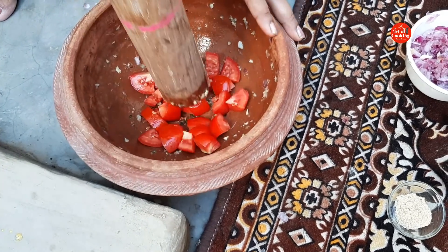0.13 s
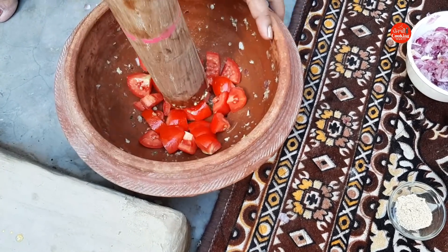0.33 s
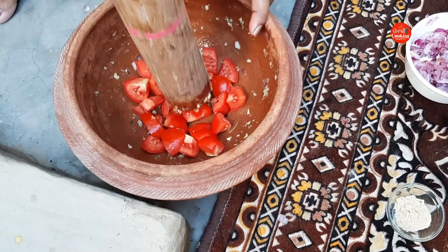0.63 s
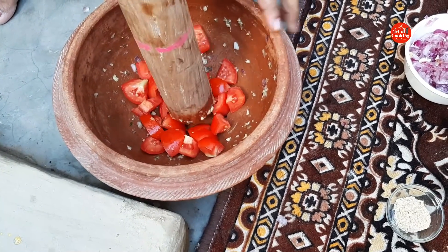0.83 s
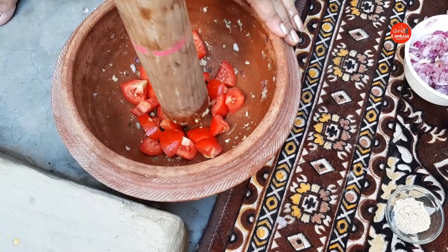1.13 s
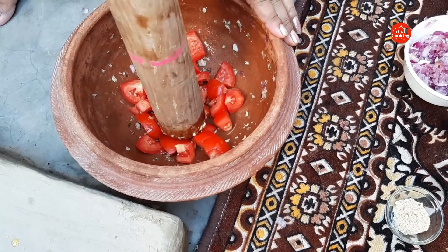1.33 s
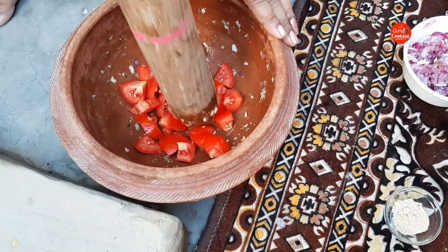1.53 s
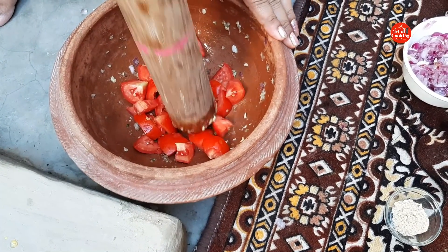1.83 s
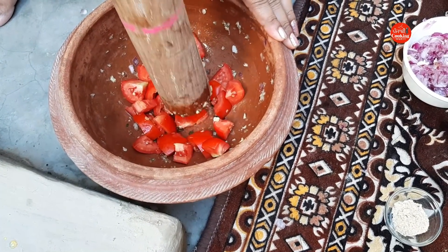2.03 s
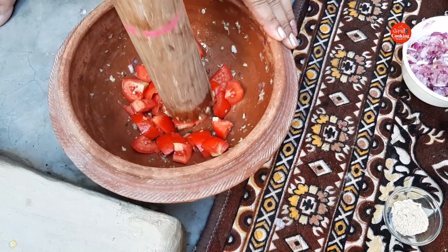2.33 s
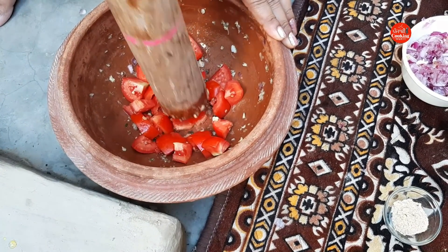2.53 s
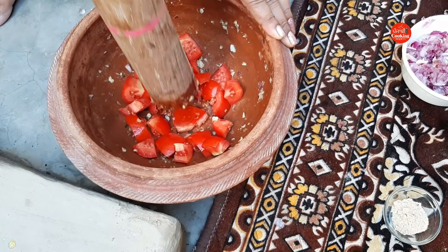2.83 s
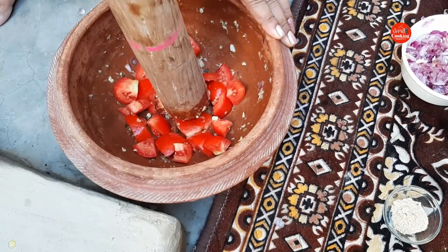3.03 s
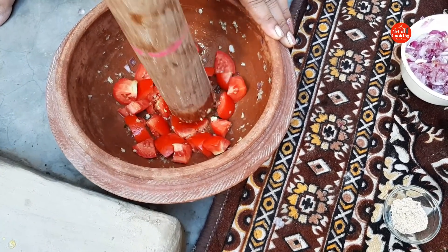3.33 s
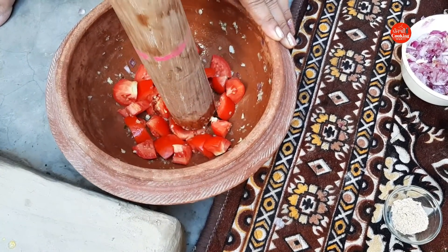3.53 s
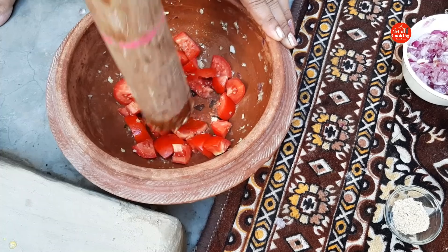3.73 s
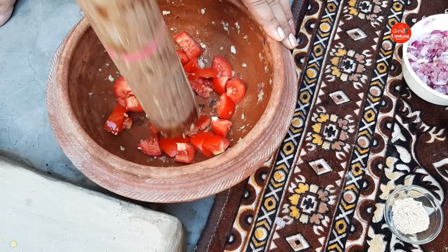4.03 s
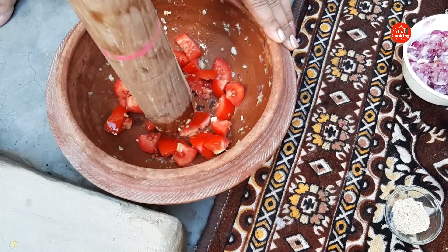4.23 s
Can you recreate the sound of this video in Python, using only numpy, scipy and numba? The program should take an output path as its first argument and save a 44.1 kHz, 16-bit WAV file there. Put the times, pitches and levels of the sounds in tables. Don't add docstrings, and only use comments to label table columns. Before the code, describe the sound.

Close up, a heavy wooden pestle thuds into cut tomatoes in a clay bowl. Light taps come first, then firmer blows about every quarter second, each with a wet squirt and a short hollow knock. After a brief gap come harder, bouncing hits. Water trickles steadily to the left above a low hum; the hard-floored room adds a little echo, and the phone gradually lowers the background.

```python
import sys
import numpy as np
from scipy import signal
from scipy.fft import rfft, irfft
from scipy.io import wavfile
from scipy.ndimage import uniform_filter1d
from numba import njit

SR = 44100
rng = np.random.default_rng(int(sys.argv[2]) if len(sys.argv) > 2 else 0)


def unload_wav(signal):
    wavfile.write(
        sys.argv[1],
        SR,
        np.round(np.clip(np.atleast_2d(signal).T, -1, 1) * 32767).astype(np.int16),
    )


def convert_level_to_amplitude(level_db):
    exponent = np.asarray(level_db, float) / 20
    return 10 ** exponent


N = 192978
TIME = np.arange(N) / SR

# t/s, force level/dB, weight passed to the floor/dB, hardness of contact/dB,
# wall pitch favoured by the spot hit f/Hz
PESTLE_BLOWS = [(0.107, -25, -9, -4, 505), (0.275, -23, -8.5, -8, 510), (0.91, -26, -4, 1.5, 500),
                (1.016, -30.5, -3.5, -3.5, 619), (1.078, -20.5, -9.5, -10, 500),
                (1.356, -27.5, 3.5, 3, 570), (1.626, -14, -13.5, -17.5, 477), (1.902, -10, -13.5, -6, 728),
                (2.175, -13, -10, -1, 513), (2.436, -6, -11.5, -4, 566), (2.725, -22, -4, -3.5, 525),
                (3.276, -11, -11.5, 14, 707), (3.558, -11.5, -10.5, 10.5, 667), (3.834, -39.5, -4, 2, 482),
                (3.873, -20.5, -17.5, -3.5, 585), (4.121, -17, -15.5, -2, 633),
                (4.16, -17.5, -14.5, -5, 500)]
# t/s, force level/dB
PESTLE_REBOUNDS = [
    (1.384, -17.5),
    (2.203, -15),
    (2.748, -22),
    (3.285, -7.5),
    (3.567, -12),
]
# t/s, force level/dB, weight passed to the floor/dB
PESTLE_NUDGES = [
    (0.023, -34.5, 1.5),
    (0.201, -33.5, -4.5),
    (0.387, -48.5, 10),
    (0.939, -26.5, -14),
    (1.126, -33.5, -9),
    (1.467, -40, 4.5),
    (4.295, -36.5, -2),
    (4.31, -32.5, -8),
]
# t/s, pulp level/dB, length/s, fineness of the jet/dB
JUICE_SQUIRTS = [(0.807, -29.5, 0.005, 11.5), (0.825, -36.5, 0.013, 8), (1.0753, -20, 0.012, 1.5),
                 (1.344, -26, 0.0068, 3), (1.61, -49, 0.0014, 11), (1.625, -11.5, .006, 6.5),
                 (1.9, -16.5, 0.0062, 1.3), (2.173, -7.5, .0065, -4), (2.187, -28, 0.013, -14),
                 (2.434, -12, 0.0043, 0.5), (2.709, -22, 0.0077, -4), (2.719, -10.5, 0.0094, -6.5),
                 (2.738, -46, 0.016, -18), (2.883, -31, 0.0059, -10), (2.99, -37, 0.01, 8),
                 (3.009, -32, 0.0095, -4.5), (3.27, -17.5, 0.0097, 0), (3.285, -9, .008, -26.5),
                 (3.293, -23.5, 0.05, -23.5), (3.5562, -21.5, 0.0041, 6), (3.566, -13.5, .009, -22),
                 (3.583, -36, .045, -17), (3.828, -42, 0.011, 4), (4.111, -26.5, 0.014, 3.5),
                 (4.1595, -32.5, 0.01, -35), (4.366, -40.5, 0.0081, 6.5)]
# f/Hz, level/dB, time to fall 60 dB t60/s
FLOOR_MODES = [(150.3, -16.5, 0.27), (170.4, 2, 0.19), (188.7, 9.5, 0.13), (202, -3.5, 0.19),
               (240.7, -12, 0.4)]
BELLY_MODES = [(329.7, -5, 0.058), (423.7, -3.5, 0.04), (452, 4.5, 0.028)]
WALL_MODES = [(499, 2.5, 0.053), (590, 4.5, 0.012), (652.7, 17, 0.016), (729.5, 10.5, 0.022),
              (822, -5.5, 0.081)]
WOOD_MODES = [(986, 3.5, 0.015), (1140, 4, 0.023), (1480, -3, 0.032), (1698, 4.5, 0.0062),
              (1960, 9, 0.0033)]
# f/Hz, level/dB, t60/s
ROOM_BANDS = [(127, -23.5, 0.85), (277.6, -17.5, 0.41), (525, -27.5, 0.26), (710, -28, 0.41),
              (1170, -24, 0.32), (2470, -19.5, 0.33), (4500, -16, 0.16), (9450, -20, .2)]
# t/s, level/dB
PHONE_GAIN = [(0, -1), (.8, -1.75), (1.6, -2), (2.5, -5), (3.2, -4.5), (3.4, -8.5), (3.52, -12),
              (3.64, -10), (3.69, -16), (3.9, -18.5), (4.38, -19)]
# t/s, level/dB, f/Hz
WATER_DROPS = [(0.4115, -30, 3950), (0.5475, -31.5, 4470), (0.7088, -29, 4500), (0.943, -34, 4500),
               (1.1443, -32, 3870), (1.517, -37.5, 4230), (1.545, -31, 4700), (2.1054, -29.5, 4400),
               (2.5064, -30, 3870), (2.5452, -31.5, 4100), (2.654, -34, 4350), (2.9064, -44, 3850),
               (2.968, -32, 4570), (3.1358, -32.5, 3800), (3.429, -34.5, 3960), (3.509, -37, 4430),
               (3.765, -55, 4220), (4.217, -41.5, 4080), (4.3, -38.5, 3850)]
# f/Hz, level/dB per Hz
HISS_COLOUR = [(710, -8.5), (1200, -11), (1760, -12), (2250, -6), (2550, -12.5), (3770, 2.5), (4420, 2),
               (5370, -0.5), (7870, 0), (10000, -12), (13000, -11), (22000, -120)]
# f/Hz, level/dB per Hz
HOUSE_COLOUR = [(41, -5.5), (70, -14.5), (103, -3.5), (172, 0.5), (380, -9), (441, -8.5), (755, -14),
                (1260, -21.5), (2190, -39), (2500, -71), (3250, -58), (5500, -120)]
# t/s, width/s, murmur level/dB, drone level/dB
HOUSE_SWELLS = [
    (0, .3, 8.5, 5),
    (.6, 0.52, -4.5, -5.5),
    (2.0, 0.27, -0.5, 7.5),
    (3.75, 0.29, -5, 4),
]
# f/Hz, level/dB
MAINS_TONES = [(100, -103), (170, -60)]
# t/s, length/s, start f/Hz, end f/Hz, level/dB
FAR_WHISTLES = [
    (2.531, 0.2, 1280, 1490, -61),
    (3.834, 0.051, 5000, 5200, -53),
    (4.304, 0.0509, 4860, 5050, -56),
]

BOWL_LAG, WATER_LAG = 4, 20
LEFT_RIGHT = np.array([[1], [-1]])


def level(x, db):
    return x * convert_level_to_amplitude(db) / np.sqrt(np.mean(x ** 2))


def band(x, lo_hz, hi_hz):
    sos = signal.butter(2, [lo_hz, min(hi_hz, .45 * SR)], "bandpass", fs=SR, output="sos")
    return signal.sosfilt(sos, x)


def low_pass(x, hz):
    return signal.sosfilt(signal.ellip(10, .2, 85, hz, fs=SR, output="sos"), x)


def colour(x, table):
    hz, db = np.transpose(table)
    f = np.maximum(np.arange(N // 2 + 1) * SR / N, 1)
    return irfft(rfft(x) * convert_level_to_amplitude(np.interp(np.log(f), np.log(hz), db)), N)


def walk(rate):
    hold = int(SR / rate)
    steps = np.repeat(rng.standard_normal(N // hold + 1), hold)
    return uniform_filter1d(steps, hold)[:N]


def die_away(t, t60):
    return np.exp(-np.log(1000) * t / t60)


def add(out, s, x, pan_db=0., lag=0):
    for ch, sign in enumerate((1, -1)):
        i = int(s * SR) + ch * lag
        n = max(min(len(x), N - i), 0)
        out[ch, i:i + n] += x[:n] * convert_level_to_amplitude(sign * pan_db / 2)


def blows():
    hits = strikes()
    out = np.zeros((2, N))
    chance = rng.standard_normal((len(hits), 4, 10))
    sway = walk(45)
    sway_starts = rng.integers(0, N - SR // 2, (len(hits), 5))
    for (s, belly_db, floor_db, wall_db, wood_db, spot_hz), c, starts in zip(hits, chance, sway_starts):
        rocking = np.array([sway[i:i + SR // 2] for i in starts])
        wall_modes = [(hz, db - 40 * np.log2(hz / spot_hz) ** 2, t60) for hz, db, t60 in WALL_MODES]
        floor = ring(FLOOR_MODES, floor_db, 0.016, c[0], rocking)
        belly = ring(BELLY_MODES, belly_db - 6, 0.0028, c[1], rocking[::-1])
        wall = ring(wall_modes, wall_db, 0.0024, c[2], rocking)
        wood = ring(WOOD_MODES, wood_db, 0.00041, c[3], rocking)
        add(out, s + .001, floor + belly, .5, BOWL_LAG)
        add(out, s + 0.0009, wall + wood, 3.0, BOWL_LAG)
        i = int(s * SR)
        wet = slosh(wall_db, rng.standard_normal((3, SR // 8)))
        out[:, i:i + SR // 8] += wet[:, :N - i]
    return out


def strikes():
    bottom_hz = 515
    rows = []
    for s, db, floor, hard, hz in PESTLE_BLOWS:
        wood_db = min(db + hard - 6, -20)
        rows.append((s, db, db + floor, db + hard, wood_db, hz))
    for s, db in PESTLE_REBOUNDS:
        rows.append((s, db, db - 10, db - 11.5, db - 5, bottom_hz))
    for s, db, floor in PESTLE_NUDGES:
        rows.append((s, db, db + floor, db - 6.5, db - 11, bottom_hz))
    return rows


def ring(modes, db, rise_s, chance, rocking):
    t = TIME[:SR // 2]
    hz, mode_db, t60 = np.transpose(modes)[:, :, None]
    k = len(modes)
    shifted_hz = hz * (1 + 0.022 * chance[:k, None])
    tones = np.sin(2 * np.pi * shifted_hz * t) * die_away(t, t60)
    waver_db = 3.5 * (rocking[:k] - rocking[:k, :1])
    balance_db = mode_db + 3.0 * chance[5:5 + k, None] + waver_db
    x = (convert_level_to_amplitude(balance_db) * tones).sum(axis=0) * (1 - np.exp(-t / rise_s))
    return convert_level_to_amplitude(db) * x / np.abs(x).max()


def slosh(wall_db, noise):
    t = TIME[:noise.shape[1]]
    rattle = band(noise[0] + 1.24 * noise[1:], 487, 906)
    x = rattle * die_away(t, 0.15) * (1 - np.exp(-t / 0.0037))
    return convert_level_to_amplitude(1.28 * wall_db - 8) * x / np.abs(x).max()


def squirts(count=70):
    size = SR // 10
    out = np.zeros((2, N + SR))
    chance = rng.random((len(JUICE_SQUIRTS), 2, 6, count))
    noise = rng.standard_normal((len(JUICE_SQUIRTS), 3, size))
    t = TIME[:size]
    for (s, pulp_db, length, fine_db), c, hiss in zip(JUICE_SQUIRTS, chance, noise):
        length = np.clip(length, .002, .05)
        pulp_hz = 3442 - 118 * s
        fizz_db, spray_db = pulp_db + fine_db, pulp_db - 8 + 0.52 * fine_db
        rise = np.minimum(t / (0.073 * length), 1)
        shape = rise * np.cos(np.pi / 2 * np.minimum(t / length, 1)) ** 1.2
        pulp = convert_level_to_amplitude(pulp_db) * pockets(c[0], pulp_hz, 0.6, length, size, 0.56)
        fizz = convert_level_to_amplitude(fizz_db) * pockets(c[1], 6300, .9, length, size, 0.3)
        spray = convert_level_to_amplitude(spray_db) * shape * band(0.12 * hiss[0] + hiss[1:], 5300, 21000)
        skin = convert_level_to_amplitude(pulp_db - 8) * shape * band(band(hiss[0], 1880, 5700), 1300, 7400)
        i = int(s * SR)
        out[:, i:i + size] += (pulp + fizz + spray + skin) * convert_level_to_amplitude(.8 * LEFT_RIGHT)
    return out[:, :N]


def pockets(c, hz, octaves, length, size, peak):
    pitch = np.clip(hz * 2 ** (octaves * (0.39 * (c[0] - .5) + c[1] - .5)), 500, 16000)
    start = (c[0] * length * SR).astype(np.int64)
    late = BOWL_LAG + (14 * (c[5] - .3) * pitch / 8000).astype(np.int64)
    squeeze = 0.48 + np.exp(-((c[0] - peak) / 0.49) ** 2)
    gain = np.sign(c[3] - .5) * convert_level_to_amplitude(-3.5 * np.log(c[4] + .01)) * squeeze
    cycles = 2.5 + 4 * c[2]
    ports = [bubbles(size, np.maximum(start + k * late, 0), pitch, cycles, gain, 0.091) for k in range(2)]
    x = np.array(ports)
    return x / np.abs(x).max()


@njit
def bubbles(size, start, hz, cycles, gain, glide):
    out = np.zeros(size)
    for k in range(len(start)):
        w = 2 * np.pi * hz[k] / SR
        n = int(cycles[k] * SR / hz[k]) + 2
        phase = 0.
        for i in range(min(3 * n, size - start[k])):
            phase += w * (1 + glide * i / n)
            out[start[k] + i] += gain[k] * np.exp(-2. * i / n) * np.sin(phase)
    return out


def room(x):
    t = TIME[:SR // 2]
    tail = 0
    for hz, db, t60 in ROOM_BANDS:
        mid, side = band(rng.standard_normal((2, len(t))), hz / np.sqrt(2), hz * np.sqrt(2))
        pair = mid + np.clip(hz / 450, 0, 1) * side * LEFT_RIGHT
        fade = die_away(t, t60) * np.clip((t - .004) / 0.00097, 0, 1)
        tail = tail + convert_level_to_amplitude(db - 17.5) * pair * fade
    return signal.fftconvolve(x[:1], tail, axes=1)[:, :N]


def background():
    noise = rng.standard_normal((8, N))
    hiss_db = -50 + gain_db(0.97) + 1.5 * walk(10)
    hiss = level(colour(noise[:3], HISS_COLOUR), 0) * convert_level_to_amplitude(hiss_db)
    flutter = band(hiss[0], 4800, 8500) * (convert_level_to_amplitude(1.6 * walk(5.94)) - 1)
    water = trickle(-49 + gain_db(0.58)) + hiss[0] + flutter
    ports = np.array([convert_level_to_amplitude(6.0) * water, convert_level_to_amplitude(-3.5) * np.roll(water, WATER_LAG)]) + 2.33 * hiss[1:]
    house_db = -52 + swell_db(axis=2) + gain_db(0.33) + 0.6 * walk(6.44)
    house = level(colour(noise[4:6], HOUSE_COLOUR), 0) * convert_level_to_amplitude(house_db)
    murmur = house[0] + 0.13 * house[1] * LEFT_RIGHT
    air_db = -49.5 + gain_db(1.05) + 2.0 * LEFT_RIGHT
    air = level(band(noise[6:], 9500, SR), 0) * convert_level_to_amplitude(air_db)
    return ports + air + hums() * convert_level_to_amplitude(.7 * LEFT_RIGHT) + murmur


def gain_db(share):
    return share * np.interp(TIME, *np.transpose(PHONE_GAIN))


def trickle(db, count=4500):
    c = rng.random((count, 4)).T
    start = (c[0] * N).astype(np.int64)
    hz = 4300 * 2 ** (0.23 * rng.standard_normal(count))
    size_db = np.minimum(-3.5 * np.log(c[1] + 1e-9), 13)
    gain = convert_level_to_amplitude(size_db) * convert_level_to_amplitude(3.3 * walk(4.7))[start]
    stream = bubbles(N, start, hz, 24.0 + 14 * c[2], gain, 0.16)
    s, drop_db, drop_hz = np.transpose(WATER_DROPS)
    drops = bubbles(N, (s * SR).astype(np.int64), drop_hz, np.full(len(s), 14.), convert_level_to_amplitude(drop_db), 0.011)
    return level(stream, 0) * convert_level_to_amplitude(db) + drops


def swell_db(axis):
    return sum(row[axis] * np.exp(-((TIME - row[0]) / row[1]) ** 2) for row in HOUSE_SWELLS)


def hums():
    motor_hz = 58.4 - 0.38 * TIME + 2.6 * walk(4)
    phase = 2 * np.pi * np.cumsum(motor_hz) / SR
    idle = (1 + np.tanh((TIME - 1.3) / 0.041)) / 2
    motor_db = -51.5 + idle * (-9 + 3.5 * walk(9.3)) + gain_db(.6) + 1.2 * walk(33)
    motor = np.sqrt(2) * np.sin(phase) * convert_level_to_amplitude(motor_db)
    drone_db = -52 + swell_db(axis=3) + gain_db(.8)
    drone = level(band(rng.standard_normal(N), 80.5, 95), -2.5) * convert_level_to_amplitude(drone_db)
    mains = sum(convert_level_to_amplitude(db) * np.sin(2 * np.pi * hz * TIME) for hz, db in MAINS_TONES)
    return motor + drone + mains


def whistles():
    out = np.zeros((2, N))
    for s, length, start_hz, end_hz, db in FAR_WHISTLES:
        u = np.linspace(0, 1, int(length * SR))
        phase = 2 * np.pi * np.cumsum(start_hz + (end_hz - start_hz) * u) / SR
        loudness = convert_level_to_amplitude(db + 3.0 * walk(90)[:len(u)]) * np.sin(np.pi * u)
        add(out, s, loudness * np.sin(phase))
    return out


def scene():
    thuds = band(blows(), 120, 12000)
    juice = squirts()
    echo = room(thuds + convert_level_to_amplitude(-6.0) * juice)
    return thuds + juice + low_pass(echo + background(), 15800) + whistles()


def roll_off(x):
    return signal.sosfilt(signal.butter(12, 16980, fs=SR, output="sos"), x)


def record(dry):
    x = signal.sosfilt(signal.butter(3, 45, "highpass", fs=SR, output="sos"), dry)
    x = x / (1 + np.abs(x) ** 4) ** .25
    mix = low_pass(x, 16800)
    return roll_off(mix)


dry = scene()
out = record(dry)
unload_wav(out)
```